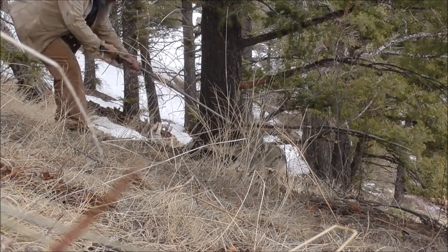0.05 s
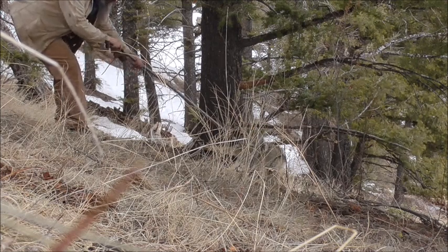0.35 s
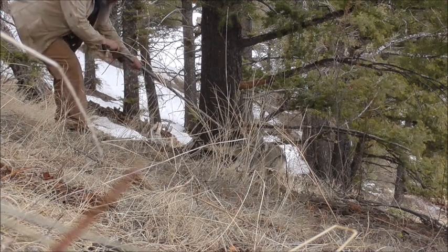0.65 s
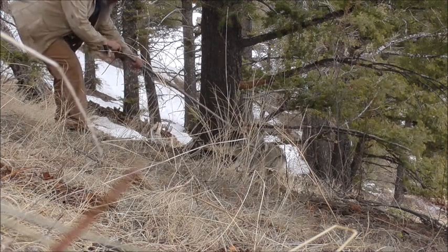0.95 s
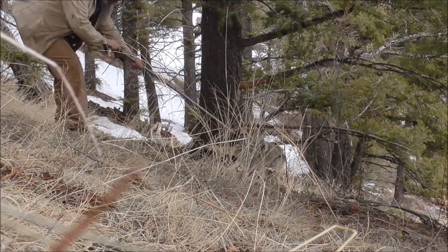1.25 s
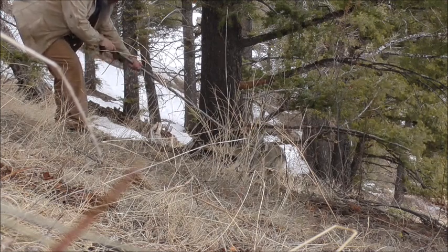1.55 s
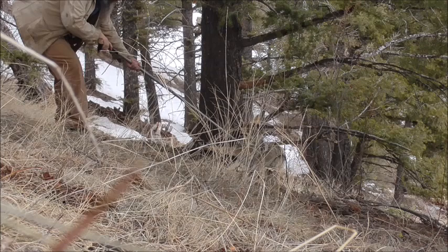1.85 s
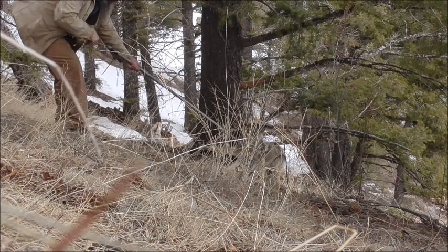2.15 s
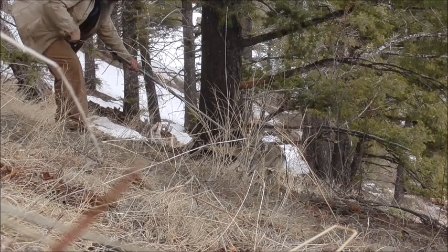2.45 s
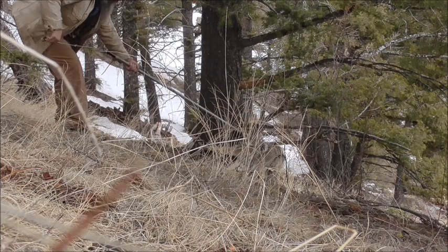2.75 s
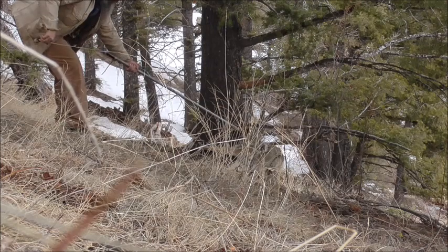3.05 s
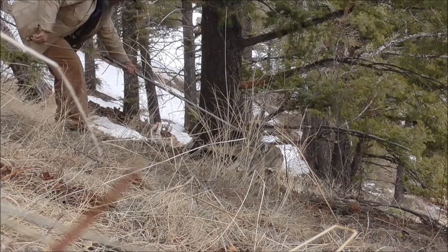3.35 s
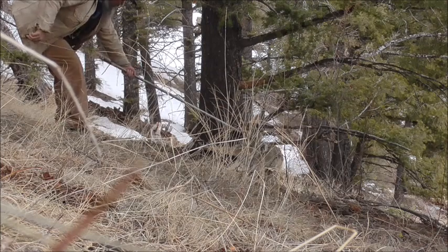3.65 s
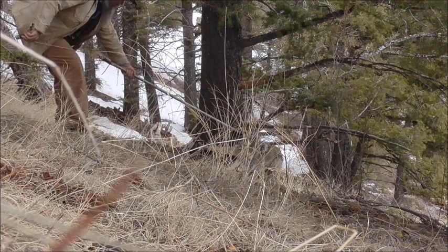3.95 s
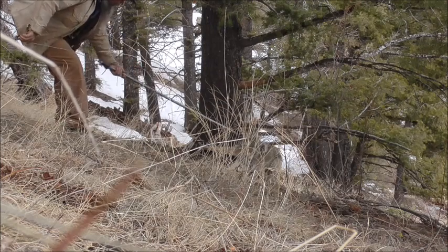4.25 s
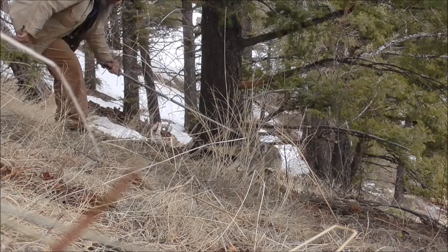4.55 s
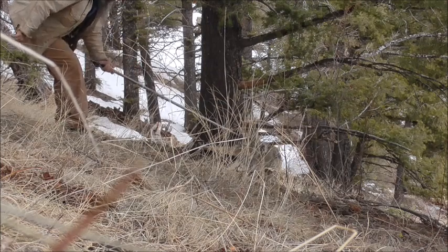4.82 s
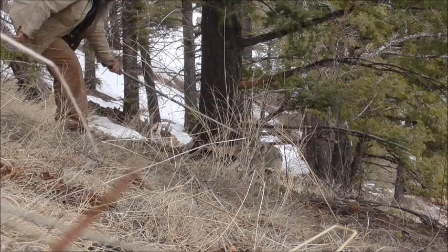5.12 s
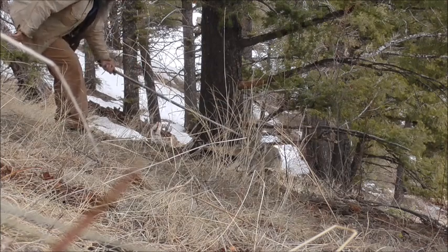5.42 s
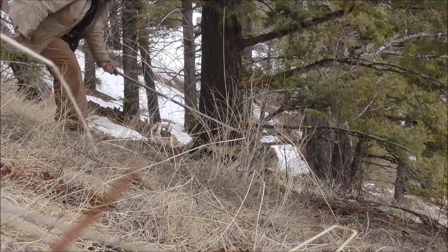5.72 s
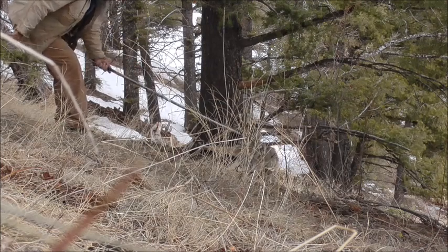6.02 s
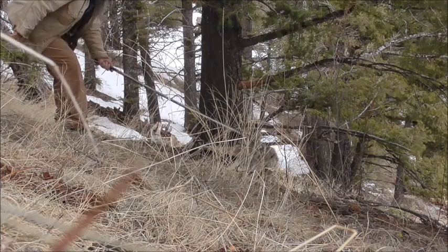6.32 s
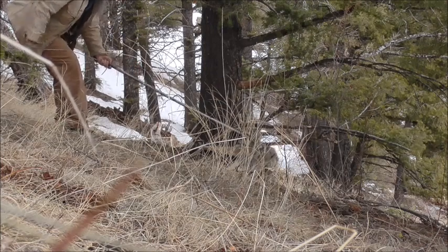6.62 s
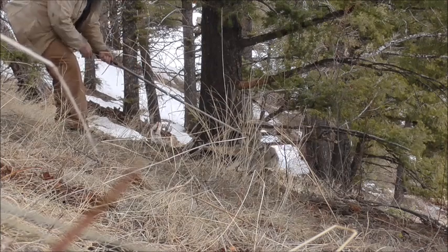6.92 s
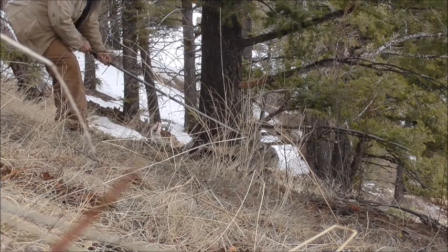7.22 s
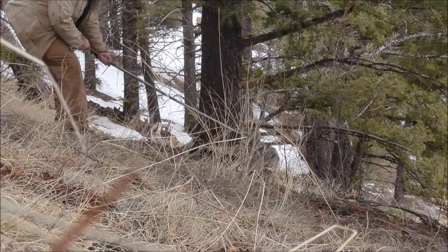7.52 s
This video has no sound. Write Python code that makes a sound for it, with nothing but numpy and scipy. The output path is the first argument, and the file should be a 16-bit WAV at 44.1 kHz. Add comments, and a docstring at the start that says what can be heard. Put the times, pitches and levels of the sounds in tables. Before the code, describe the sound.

Over a soft outdoor hush and faint ticking close to the microphone, dry stalks swish and crackle. A bright, squeaky jangle follows as a trap chain is dragged through the grass, then tugged in short bursts. Boots thud and scuff on turf, a pole knocks on the steel trap and the links rattle again. After a lull, one sharp metallic clink echoes briefly among the trees.

```python
"""In a quiet wood, a steel trap chain is hauled through dry grass: one long pull, then short tugs.
Links catch, click and squeak over each other and ring the trap's steel. A pole knocks on the trap,
boots thud and scuff on turf, stalks rustle and snap, all with a short echo from the trees.
A camera's mechanism ticks faintly over the hush of the air."""
import sys
import numpy as np
from scipy import signal
from scipy.fft import rfft, irfft
from scipy.io import wavfile
from scipy.ndimage import uniform_filter1d

SR = 44100
rng = np.random.default_rng(int(sys.argv[2]) if len(sys.argv) > 2 else 0)


def transcribe(signal):
    """Save signal, clipped to [-1, 1], as a 16-bit WAV file at the path in sys.argv[1]."""
    frames = np.atleast_2d(signal).T
    limited = np.clip(frames, -1, 1)
    pcm = np.round(limited * 32767).astype(np.int16)
    wavfile.write(sys.argv[1], SR, pcm)


N = 334278

# Spectra. Each row: frequency in Hz, gain in dB.
AIR_SPECTRUM = [(25, -38), (38, -40), (60, -6.5), (80, -19.5), (110, -10), (230, -5), (500, -11),
                (680, -15.5), (900, -10.5), (1600, -16.5), (2500, -18), (3000, -26.5), (6000, -31),
                (12000, -37)]
HISS_SPECTRUM = [(1000, -4), (4000, -4), (6500, -5.5), (7200, -3.5), (8200, 0), (11000, 0), (13000, -2),
                 (15800, -4)]
GRASS_SPECTRUM = [(300, 0), (1000, 2.5), (3000, -3.5), (6000, -4.5), (8500, 6), (11500, 6), (14000, -2),
                  (16000, -22)]
TICK_SPECTRUM = [(500, -26), (3000, -9), (6000, -22), (8000, 2), (13000, 3.5), (16000, -16)]
KNOCK_SPECTRUM = [(300, -27), (1200, -0.5), (2700, -2), (4000, 4), (5800, -1), (8200, 7.5), (11500, 7),
                  (14000, -12), (16000, -43)]
STEEL_SPECTRUM = [(500, -19.5), (2000, -10.5), (5200, -22.5), (6200, -22), (6700, -3.5), (7600, -0.5),
                  (9800, -1), (11700, 3), (13000, 2), (14500, -12), (16000, -26)]
GROUND_SPECTRUM = [(30, -26), (100, -16), (175, 2), (400, -1), (640, 0.5), (850, 3.5), (1300, -0.5),
                   (2000, -2), (2800, -12), (4200, -6), (6000, -8), (12000, -69)]
SOLE_SPECTRUM = [(100, -16), (190, -0.5), (310, 3), (410, -8), (540, -8), (700, -27), (1100, -12),
                 (4000, -55)]

# Resonances. Each row: frequency in Hz, bandwidth in Hz, gain in dB.
SHELL_MODES = [(1449, 59, 12), (1674, 210, 3), (1930, 140, 4), (2277, 188, 10), (2516, 60, 7.5)]
TRAP_MODES = [(853, 51, -7), (1109, 44, 2), (1267, 170, -10), (1379, 56, 0.5), (1800, 110, -11.5),
              (2200, 220, -12.5), (2520, 81, -11), (3230, 200, -11.5), (3820, 180, -12.5), (4320, 78, -8.5)]
CHAIN_LOW_MODES = [(3013, 19, -3), (3540, 69, -1.5), (3970, 48, -1.5), (4860, 41, -3), (5600, 34, -2.5),
                   (6150, 41, -1), (6520, 11, 1.5), (6590, 130, 4)]
TURF_MODES = [(182, 22, -15), (261, 87, 3), (326, 140, -0.5), (494, 69, -6)]
LOOSE_RING_MODES = [(6694, 24, 14), (7500, 81, 5.5), (7750, 110, 7), (10700, 430, -8)]
LINK_MODES = [(7660, 50, -4), (8420, 60, -5), (8690, 60, -6), (9110, 55, -5), (9300, 50, -3), (9597, 25, 1),
              (9955, 25, 0), (10075, 50, -3), (10325, 30, 0), (10520, 55, -3), (10715, 55, -3),
              (11180, 60, -4), (11502, 20, 1), (11730, 50, -4)]

# Brushing movements. Each row: peak time in seconds, rise in seconds, fall in seconds, level in dB.
GRASS_SWISHES = [(.02, .05, 0.057, -49.5), (.11, 0.042, .05, -51.5), (.27, 0.11, 0.095, -49.5),
                 (.38, 0.016, 0.087, -44.5), (.525, 0.033, 0.036, -48), (.73, 0.034, 0.046, -50.5),
                 (.82, .06, 0.12, -55), (4.11, 0.044, 0.037, -46), (4.37, 0.27, 0.23, -45.5),
                 (4.55, 0.018, 0.024, -39), (4.755, 0.075, 0.15, -49), (5.09, 0.055, 0.092, -46.5),
                 (5.285, 0.065, 0.1, -44), (6.04, 0.12, 0.13, -54.5), (7.555, 0.032, 0.0072, -36)]
SOLE_SCUFFS = [(4.11, .02, .03, -52.5), (4.56, 0.028, 0.044, -51), (5.06, 0.063, 0.044, -49),
               (5.262, .015, 0.032, -48), (5.315, .025, 0.045, -48.5), (5.39, .03, .04, -58),
               (5.52, .02, .03, -55), (7.005, 0.049, .035, -48)]
# Sharp ticks and cracks of snapping stalks, knocks and struck steel.
# Each row: start in seconds, tick level in dB, tick pitch in Hz, crack level in dB, crack pitch in Hz.
SHARP_CRACKS = [(.096, -34, 11500, -54, 3460), (0.1117, -39, 8810, -40, 4750),
                (.2375, -38, 10600, -49, 3710), (0.2574, -34, 9400, -41, 3500),
                (.274, -39, 9200, -44, 3900), (0.3624, -23.5, 9100, -55, 4010),
                (.367, -30, 10100, -49, 6350), (0.405, -34, 12200, -42, 3440),
                (.5205, -37, 10500, -46, 4900), (0.528, -29, 12300, -56, 4790),
                (1.9611, -29.5, 12500, -50, 4090), (4.7398, -32, 10500, -47, 3850),
                (5.241, -43, 8800, -53, 3600), (5.5022, -27, 9100, -54, 4000),
                (5.5432, -35, 11000, -36.5, 5450), (5.609, -34, 9600, -48, 4500),
                (7.515, -29, 11800, -34, 4450), (7.5443, -26, 10200, -46, 4400),
                (7.548, -20, 10500, -31, 2300)]
# Knocks on the trap and a few soft footstep scuffs.
# Each row: start in seconds, contact level in dB, clunk level in dB, strongest pitch in Hz.
KNOCKS_AND_SCUFFS = [(0.111, -52, -50, 850), (.385, -62, -45, 830), (.924, -57, -49, 1300),
                     (2.178, -30, -40.5, 1100), (2.32, -51, -50, 1197), (2.683, -56, -37, 1200),
                     (4.083, -40.5, -48, 1350), (4.444, -44.5, -48, 1150), (4.473, -45, -38.5, 1120),
                     (4.486, -41, -45, 1100), (4.54, -50, -44.5, 1100), (4.741, -43.5, -53, 1100),
                     (5.2382, -43.5, -37, 1260), (5.283, -45, -51, 1400), (5.374, -50, -45, 1320),
                     (5.403, -51, -45, 900), (5.496, -46, -46.5, 1360), (5.609, -48.5, -46.5, 1100),
                     (5.77, -48, -47, 1400), (5.886, -46.5, -48, 1200), (7.502, -42.5, -39, 1420),
                     (7.544, -41, -50, 1100)]
# Blows on the turf and on a loose ring of the chain. Each row: start in seconds, level in dB.
TURF_THUDS = [(.114, -43), (4.081, -34.5), (4.534, -44.5), (5.24, -31.5), (5.379, -46), (5.5, -43),
              (5.779, -43.5), (5.914, -46.5), (7.512, -38.5), (7.536, -38.5)]
RING_CLINKS = [(0.224, -46), (4.12, -44), (5.404, -42), (5.646, -48), (5.988, -50), (6.11, -53),
               (7.548, -20)]
# Steel slipping on steel. Each row: start in seconds, half-length in seconds, pitch in Hz,
# glide per half-length in Hz, level in dB.
LINK_SQUEAKS = [(2.13, 0.0086, 10150, 94.5, -25), (2.138, 0.011, 10500, 100, -26.5),
                (2.193, 0.011, 9900, 13, -27), (2.857, 0.0034, 10500, -2, -23),
                (2.867, 0.014, 10240, -400, -26), (2.889, 0.018, 8900, 200.5, -34),
                (2.971, .008, 10400, 0, -33), (5.468, 0.015, 10940, -100, -29),
                (5.48, 0.012, 9600, -400, -39), (5.496, 0.014, 9160, 107, -36),
                (5.568, 0.013, 9900, 600, -29.5)]
# The long pull. Each row: time in seconds, link level in dB, trap level in dB, link pitch in Hz.
LONG_PULL = [(2.142, -29.5, -49, 9900), (2.167, -24, -38.5, 9900), (2.19, -18.5, -57, 10500),
             (2.221, -25.5, -47, 10000), (2.273, -16.5, -43.5, 10800), (2.31, -23, -48, 10100),
             (2.335, -17, -38.5, 9700), (2.39, -19.5, -43, 10180), (2.45, -24.5, -43, 10600),
             (2.54, -23, -43, 10500), (2.61, -19, -41, 12300), (2.68, -21, -42, 10060),
             (2.74, -31, -44, 9650), (2.817, -28.5, -42.5, 9900), (2.98, -31.5, -45.5, 10100),
             (3.06, -48, -52.5, 9300)]
# Short tugs. Each row: start, rise and fall in seconds, link and trap levels in dB, link pitch in Hz.
SHORT_TUGS = [(3.201, 0.045, 0.07, -31.5, -46, 9600), (3.522, 0.053, 0.08, -27, -51, 9700),
              (3.785, 0.069, 0.13, -33, -53, 9500), (4.974, 0.092, .04, -27.5, -49, 9500)]
# Links that snag and jerk free. Each row: start in seconds, level in dB, pitch in Hz.
LINK_SNAGS = [(2.16, -16.5, 10000), (2.18, -17, 10100), (2.288, -23, 11300), (2.3205, -21.5, 9940),
              (2.362, -21, 10400), (2.371, -25, 9700), (2.3898, -29, 10000), (2.4447, -30, 10500),
              (2.465, -23.5, 10400), (2.4966, -32, 10700), (2.569, -21.5, 11900), (2.632, -28, 10550),
              (2.6567, -25, 9700), (2.674, -27, 9500), (2.6845, -24.5, 9800), (2.708, -22.5, 10200),
              (2.8313, -23.5, 10300), (2.8582, -24, 10100), (2.8923, -21.5, 10100), (2.9567, -24.5, 10550),
              (2.9724, -21, 10340), (3.0484, -37.5, 8900), (3.2034, -27, 10200), (3.216, -28, 9800),
              (3.2265, -24, 9800), (3.2365, -23.5, 9600), (3.2485, -27, 9700), (3.259, -28, 9600),
              (3.272, -24.5, 9600), (3.292, -27, 9600), (3.3115, -31, 9500), (3.339, -37, 9800),
              (4.084, -27.5, 11200), (4.4435, -26, 8550), (4.448, -33, 10900), (4.468, -29, 11500),
              (4.4868, -24, 8700), (4.492, -30, 10600), (4.544, -36, 9000), (4.563, -32, 9700),
              (4.999, -31.5, 9000), (5.0195, -24.5, 9700), (5.033, -22.5, 10100), (5.046, -23, 9900),
              (5.0558, -25, 9800), (5.064, -20.5, 9900), (5.1854, -36.5, 9400)]
# Envelopes of the trap's held tone, the chain's run over an edge and that edge's ring.
# Each row: time in seconds, level in dB.
SINGING_LEVELS = [(2.145, -48.5), (2.18, -35), (2.225, -49), (2.285, -42.5), (2.375, -41.5), (2.43, -60),
                  (2.56, -56), (2.66, -48), (2.72, -58), (2.77, -48), (2.93, -60), (2.995, -47),
                  (3.04, -70)]
RUN_LEVELS = [(2.3, -59), (2.5, -29.5), (2.62, -54), (2.76, -35), (2.84, -31.5), (2.94, -28.5),
              (3.0, -54.5)]
EDGE_LEVELS = [(2.3, -73), (2.35, -55), (2.5, -56), (2.66, -57), (2.78, -56.5), (2.95, -56), (3.04, -65)]

REBOUND_S = 0.022  # typical delay of a knock's one bounce


def undb(db):
    """Decibels to gain."""
    return 10 ** (np.asarray(db) / 20)


def through(x, response):
    """Convolve with a response scaled to unit energy."""
    response = np.atleast_2d(response / np.sqrt(np.sum(response ** 2, axis=-1, keepdims=True)))
    return signal.fftconvolve(x, response, axes=-1)[:, :x.shape[-1]]


def colour(x, spectrum, size=4096):
    """Minimum-phase filter with the given spectral shape."""
    hz, db = np.transpose(spectrum)
    gain = undb(np.interp(np.log(np.fft.rfftfreq(size, 1 / SR) + 1), np.log(hz), db))
    cepstrum = irfft(np.log(gain))
    cepstrum[1:size // 2] *= 2
    cepstrum[size // 2 + 1:] = 0
    return through(x, irfft(np.exp(rfft(cepstrum))))


def butter(x, order, hz, kind):
    """Butterworth filter."""
    return signal.sosfilt(signal.butter(order, hz, kind, fs=SR, output="sos"), x)


def ring(x, modes):
    """Drive damped resonances."""
    t = np.arange(SR // 4) / SR
    response = sum(undb(db) * width_hz * np.exp(-np.pi * width_hz * t) * np.sin(2 * np.pi * hz * t)
                   for hz, width_hz, db in modes)
    return through(x, response)


def grit(spread, rough_db, size=N):
    """Stereo noise of uneven micro-impacts; spread weights the part unrelated between the ears."""
    noise = rng.standard_normal(size) + spread * rng.standard_normal((2, size))
    noise *= undb(rough_db * np.repeat(rng.standard_normal(size // 16 + 1), 16)[:size])
    return noise / np.std(noise)


def pan(x, left_db):
    """Lean a sound to the left."""
    return x * undb(np.array([[left_db], [-left_db]]) / 2)


def add(out, start_s, sound):
    """Mix a sound in."""
    start = max(int(start_s * SR), 0)
    out[..., start:start + sound.shape[-1]] += sound[..., :max(N - start, 0)]


def match_rms(x, reference):
    """Scale x to the reference's rms."""
    return x * np.sqrt(np.mean(reference ** 2) / np.mean(x ** 2))


def blows(times_s, levels_db, rise_s, decay_s):
    """Force envelope of blows, summed in power."""
    power, t = np.zeros(N), np.arange(SR // 8) / SR
    shape = (1 - np.exp(-t / rise_s)) * np.exp(-t / decay_s)
    for start_s, db in zip(times_s, levels_db):
        add(power, start_s, (undb(db) * shape / shape.max()) ** 2)
    return np.sqrt(power)


def twice(times_s, levels_db, gap_s, second_db, jitter=0.18):
    """Times and levels with a second blow about gap_s after each."""
    later_s = times_s + gap_s * np.exp(jitter * rng.standard_normal(len(times_s)))
    return np.concatenate([times_s, later_s]), np.concatenate([levels_db, np.add(levels_db, second_db)])


def curve(tables, column=1):
    """Summed gain along one dB column of each table, silent outside its span."""
    t = np.arange(N) / SR
    return sum(undb(np.interp(t, rows[:, 0], rows[:, column], left=-200, right=-200))
               for rows in map(np.array, tables))


def swells(rows, fade_db=9.5):
    """Gain of swells, each fade_db down one rise time before its peak and one fall time after."""
    t = np.arange(N // 64 + 1) * 64 / SR
    power = np.zeros(len(t))
    for peak_s, rise_s, fall_s, db in rows:
        distance = np.maximum((peak_s - t) / rise_s, (t - peak_s) / fall_s)
        power += undb(db - fade_db * np.clip(distance, 0, 20)) ** 2
    return np.interp(np.arange(N) / SR, t, np.sqrt(power))


def hush(air_db=-55, hiss_db=-56.4):
    """Distant air in the trees plus microphone hiss, both unrelated between the ears."""
    air = undb(air_db) * colour(rng.standard_normal((2, N)), AIR_SPECTRUM)
    hiss = undb(hiss_db) * colour(rng.standard_normal((2, N)), HISS_SPECTRUM)
    return pan(air, 4.6) + hiss


def grass(gain_db=-3):
    """Dry stalks brush past each other in swishes."""
    return colour(undb(gain_db) * swells(GRASS_SWISHES) * grit(0.54, 3.5), GRASS_SPECTRUM)


def camera(rate_hz=59.94, tick_db=-33, whirr_db=-63, top_hz=2660, lead_s=0.00121, left_lag_s=0.00048):
    """An actuator twitches to and fro: a dry tick on release, then a stop that rings the shell."""
    times_s = np.arange(0.0052, N / SR, 1 / rate_hz)
    uneven_db = 1.4 * rng.standard_normal(len(times_s))
    ticks = np.zeros(N)
    ticks[(times_s * SR).astype(int)] = undb(uneven_db + tick_db) * (-1) ** np.arange(len(times_s))
    snap = ticks - uniform_filter1d(ticks, size=23)
    release = undb(-1) * np.roll(snap, -round(lead_s * SR))
    stop = undb(-7) * snap
    whirr = blows(times_s, uneven_db + whirr_db, rise_s=0.0005, decay_s=0.003) * grit(0.6, 0)
    shell = ring(ticks + whirr, SHELL_MODES)
    out = signal.sosfilt(signal.ellip(6, 0.5, 50, top_hz, fs=SR, output="sos"), release + stop + shell)
    out[0] = np.roll(out[0], round(left_lag_s * SR))
    return pan(out, -13)


def cracks():
    """Snapping stalks, knocks and struck steel: each a high tick with a lower crack."""
    out, t = np.zeros((2, N)), np.arange(SR // 50) / SR

    def burst(hz, width_hz, decay_s):
        impulse = grit(0.26, 0.77, size=len(t)) * np.exp(-t / decay_s)
        return through(impulse, np.exp(-np.pi * width_hz * t) * np.cos(2 * np.pi * hz * t))

    for start_s, tick_db, tick_hz, crack_db, crack_hz in SHARP_CRACKS:
        tick = colour(burst(tick_hz, width_hz=2600, decay_s=0.0013), TICK_SPECTRUM, size=256)
        crack = burst(crack_hz, width_hz=450, decay_s=0.00097)
        add(out, start_s, undb(tick_db + 1) * tick / np.abs(tick).max())
        add(out, start_s, undb(crack_db) * crack / np.abs(crack).max())
    return out


def knocks_and_scuffs(rebound_db=-11):
    """Soft-edged contact noise of wood knocking on steel and of a few footstep scuffs."""
    times_s, levels_db, _, _ = np.transpose(KNOCKS_AND_SCUFFS)
    force = blows(*twice(times_s, levels_db, REBOUND_S, rebound_db), rise_s=0.0008, decay_s=0.016)
    return colour(force * grit(0.4, 2.5), KNOCK_SPECTRUM)


def clunks(rise_s=0.00018, decay_s=0.0064, focus_db_per_octave=22, detune=0.017, rebound_db=-7.5):
    """The dry body of each knock or scuff: the trap's low modes, focused on one pitch."""
    out, t = np.zeros((2, N)), np.arange(SR // 10) / SR
    shape = (1 - np.exp(-t / rise_s)) * np.exp(-t / decay_s)
    for start_s, _, clunk_db, focus_hz in KNOCKS_AND_SCUFFS:
        modes = [(hz * (1 + detune * rng.standard_normal()), 0.76 * width_hz,
                  db - focus_db_per_octave * abs(np.log2(hz / focus_hz)))
                 for hz, width_hz, db in TRAP_MODES[:5]]
        for at_s, db in zip(*twice([start_s], [clunk_db], REBOUND_S, rebound_db)):
            clunk = ring(shape * grit(0.23, 3.6, size=len(t)), modes)
            add(out, at_s, undb(db + 1) * match_rms(clunk, shape))
    return pan(out, 3.9)


def rattle(caught, gain_db=-30, spot_db=4, knock_db=14):
    """Catches, knocks and scuffs ring the low modes of chain and swivel; each favours other modes."""
    hits = [(s, db) for s, db, _ in caught] + [(s, db + knock_db) for s, db, _, _ in KNOCKS_AND_SCUFFS]
    times_s, levels_db = np.transpose(hits)
    spots_db = spot_db * np.clip(rng.standard_normal((len(hits), len(CHAIN_LOW_MODES))), -2, 2)
    contact = undb(gain_db) * grit(0.25, 2.3)
    out = np.zeros((2, N))
    for (hz, width_hz, db), favour_db in zip(CHAIN_LOW_MODES, spots_db.T):
        force = blows(times_s, levels_db + db + favour_db, rise_s=0.00023, decay_s=0.001)
        out += ring(force * contact, [(hz, width_hz, 0)])
    return out


def thuds(push_s=0.0011, push_db=12, soil_db=-4, settle_s=0.027, settle_db=-9):
    """A boot or pole butt pushes into the turf, then settles; each push crushes a little soil."""
    steps = twice(*np.transpose(TURF_THUDS), settle_s, settle_db)
    pushes = np.zeros((1, N))
    pulse = np.hanning(int(push_s * SR) + 3)
    for start_s, db in zip(*steps):
        add(pushes, start_s, undb(db + push_db) * pulse / np.sqrt(np.sum(pulse)) / 2)
    soil = undb(soil_db) * blows(*steps, rise_s=0.00088, decay_s=0.0074) * grit(0.71, 0.39)
    return pan(ring(pushes + soil, TURF_MODES), 2.2)


def clinks(gain_db=20, bounce_db=-5, gap_s=0.0035, count=4):
    """A loose ring is struck, chatters and rings on at its lowest mode."""
    taps = np.zeros((1, N))
    for start_s, db in RING_CLINKS:
        for k in range(count):
            add(taps, start_s + k * gap_s, undb([db + gain_db + k * bounce_db]))
    return pan(butter(ring(taps, LOOSE_RING_MODES), 10, 6250, "high"), -0.5)


def squeaks(scatter_hz=300, rasp_db=-9, rasp_span_hz=2500, count=5):
    """A slipping link sings a brief cluster of close, beating tones over a rasp."""
    out = np.zeros((2, N))
    for start_s, half_s, hz, glide_hz, db in LINK_SQUEAKS:
        u = np.arange(int(2 * half_s * SR)) / (half_s * SR)
        pitch_hz = hz + glide_hz * u + scatter_hz * rng.standard_normal((count, 1))
        cycles = np.cumsum(pitch_hz, axis=1) / SR + rng.random((count, 1))
        tone = np.sin(2 * np.pi * cycles).sum(0)
        band = [(hz - rasp_span_hz, -30), (hz, 0), (hz + rasp_span_hz, -30)]
        rasp = undb(rasp_db) * colour(grit(0.53, 1.7, size=len(u)), band, size=256)
        slip = (tone / np.std(tone) + rasp) * np.sqrt(u) * np.exp(-2 * u ** 2)
        add(out, start_s, undb(db) * slip / np.std(slip) / np.sqrt(2))
    return pan(out, -0.55)


def hauls(link_fade_db=16, trap_fade_db=5, roundness=1.3):
    """The pull and each tug as tables with LONG_PULL's columns; a tug is weaker at both ends."""
    u = np.linspace(-1, 1, 21)
    slack = np.abs(u) ** roundness
    tables = [np.array(LONG_PULL)]
    for start_s, rise_s, fall_s, link_db, trap_db, hz in SHORT_TUGS:
        times_s = start_s + np.interp(u, [-1, 0, 1], [0, rise_s, rise_s + fall_s])
        tables.append(np.column_stack([times_s, link_db - link_fade_db * slack,
                                       trap_db - trap_fade_db * slack, np.full(len(u), hz)]))
    return tables


def catches(top_per_s=92, top_db=-25, rate_power=0.45, jitter=0.095, scatter_db=2, scatter_hz=770):
    """Links catch faster the harder the haul, up to top_db. Rows of seconds, dB, Hz, snags included."""
    rows = list(LINK_SNAGS)
    for haul in hauls():
        times_s, levels_db, _, pitches_hz = haul.T
        at_s = times_s[0]
        for late, strong, high in np.clip(rng.standard_normal((160, 3)), -2, 2):
            if at_s > times_s[-1]:
                break
            db = np.interp(at_s, times_s, levels_db)
            hz = np.interp(at_s, times_s, pitches_hz)
            rows.append((at_s, db + scatter_db * strong, hz + scatter_hz * high))
            rate_per_s = top_per_s * undb(min(db - top_db, 0)) ** rate_power
            at_s += np.exp(jitter * late) / rate_per_s
    return rows


def links(caught, grind_s=0.0061, width_hz=1250, grind_db=-8.5, crack_db=-1.5, scrape_db=-20):
    """Each link cracks at its own pitch, grinds over the edge and seats; the chain scrapes between."""
    clicks, t = np.zeros((2, N)), np.arange(SR // 25) / SR
    shape = (1 - np.exp(-t / 0.0005)) * np.exp(-(t / grind_s) ** 2)
    shape /= shape.max()
    rust = grit(0.39, 1.7)
    for start_s, db, hz in caught:
        contact = rust[:, int(start_s * SR):][:, :len(t)] * shape
        note = np.exp(-np.pi * width_hz * t) * np.cos(2 * np.pi * hz * t)
        grind = colour(undb(3.5) * contact + undb(9) * through(contact, note), STEEL_SPECTRUM, size=512)
        add(clicks, start_s, undb(db + grind_db) * match_rms(grind, shape))
        crack = np.sqrt(t) * note
        catch_and_seat = twice([start_s], [db + crack_db], gap_s=0.0055, second_db=-4)
        for at_s, hit_db in zip(*catch_and_seat):
            add(clicks, at_s, undb(hit_db) * crack / np.abs(crack).max())
    scrape = colour(undb(scrape_db) * curve(hauls()) * grit(0.37, 1.7), STEEL_SPECTRUM)
    steel = clicks + scrape
    return steel + undb(-13) * ring(steel, LINK_MODES)


def trap(caught, drag_db=-3.5, ground_db=-4.5, jolt_db=-22):
    """Drag and catching links shake the trap, damped by the turf it lies on."""
    times_s, levels_db, _ = np.transpose(caught)
    drag = undb(drag_db) * curve(hauls(), column=2)
    shaken = ring(drag * grit(0.19, 3.9), TRAP_MODES)
    jolts = undb(jolt_db) * blows(times_s, levels_db, rise_s=0.00024, decay_s=0.0014)
    jolted = ring(jolts * grit(0.98, 2.1), TRAP_MODES[:5])
    ground = undb(ground_db) * colour(drag * grit(1.17, 4.5), GROUND_SPECTRUM)
    return pan(shaken + jolted, 3.3) + pan(ground, 0.44)


def singing(pitch_hz=1096, wander_hz=16, flutter_db=1.5, gain_db=-2, rasp=0.29, window=500):
    """The taut chain bows the trap's main mode: a wavering tone that rasps as the grip slips."""
    wander, flutter = uniform_filter1d(rng.standard_normal((2, N)), window, axis=1) * np.sqrt(window)
    grip = 1 + rasp * colour(rng.standard_normal((1, N)), [(120, -2), (500, -16), (2000, -60)])
    tone = np.sqrt(2) * grip * np.sin(2 * np.pi * np.cumsum(pitch_hz + wander_hz * wander) / SR)
    return pan(tone * curve([SINGING_LEVELS]) * undb(gain_db + flutter_db * flutter), 5.3)


def judder(rate_hz=87, jitter=0.024, gain_db=6):
    """Link after link bumps over one edge and drums faintly on the turf."""
    times_s = np.cumsum(1 + jitter * rng.standard_normal(N // 256)) / rate_hz
    bumps = np.zeros((1, N))
    bumps[0, (times_s[times_s < N / SR] * SR).astype(int)] = undb(gain_db)
    return pan(ring(bumps * curve([RUN_LEVELS]), TURF_MODES), 1.8)


def edge(pitch_hz=4410, width_hz=50, gain_db=-1):
    """The trap's edge rings thinly under the running chain."""
    return undb(gain_db) * ring(curve([EDGE_LEVELS]) * grit(0.26, 3.1), [(pitch_hz, width_hz, 0)])


def soles():
    """A sliding sole crushes turf: a loose, low scrape."""
    return pan(colour(swells(SOLE_SCUFFS) * grit(0.8, 4.5), SOLE_SPECTRUM), 1.1)


def tree_echo(x, gain_db=-18, t60_s=0.3, delay_s=0.004):
    """Trunks and slope scatter a short, thin echo."""
    t = np.arange(SR // 2) / SR
    tail = rng.standard_normal((2, len(t))) * np.exp(-np.log(1000) * t / t60_s) * (t > delay_s)
    return undb(gain_db) * through(x, tail)


def scene():
    """Work at the trap, its echo and the background."""
    caught = catches()
    work = links(caught) + trap(caught) + rattle(caught) + singing() + edge() + clunks() + judder()
    work = work + squeaks() + clinks() + knocks_and_scuffs() + thuds() + soles() + grass() + cracks()
    work = butter(work + tree_echo(work), 4, 154, "high")
    work = butter(work, 6, 14900, "low")
    work[0] = butter(work[0], 1, 11000, "low")  # left port faces slightly away: less treble
    work[1] = butter(work[1], 1, 18000, "low")
    return work + camera() + hush()


def record(dry, widen_db=-4, top_hz=15850):
    """The stereo microphone widens the lower middle; the recorder cuts the top."""
    side = butter((dry[0] - dry[1]) / 2, 1, [200, 700], "band")
    wide = dry + undb(widen_db) * np.array([side, -side])
    return signal.sosfilt(signal.ellip(10, 0.2, 70, top_hz, fs=SR, output="sos"), wide)


dry = scene()
out = record(dry)
transcribe(out)
```